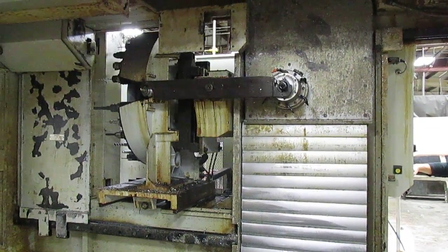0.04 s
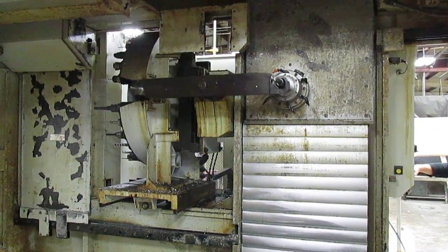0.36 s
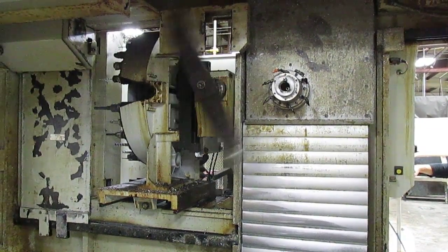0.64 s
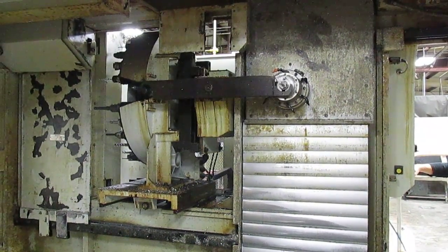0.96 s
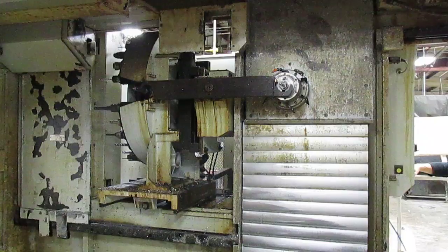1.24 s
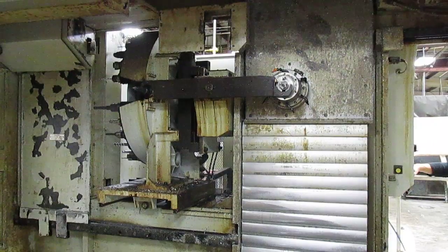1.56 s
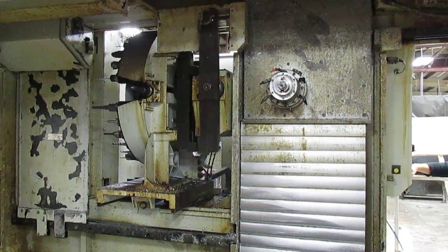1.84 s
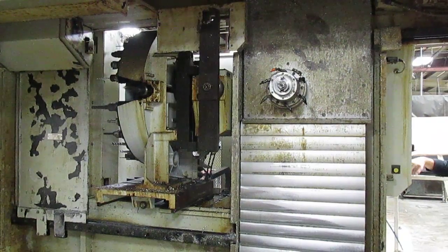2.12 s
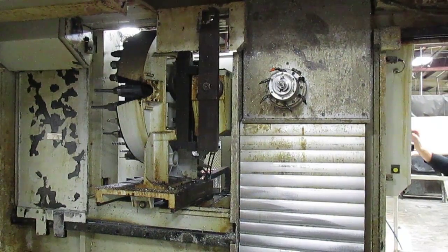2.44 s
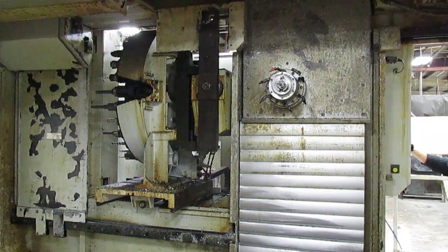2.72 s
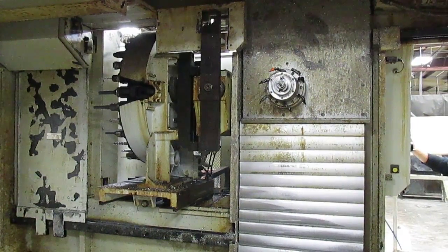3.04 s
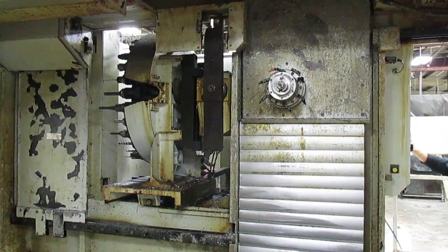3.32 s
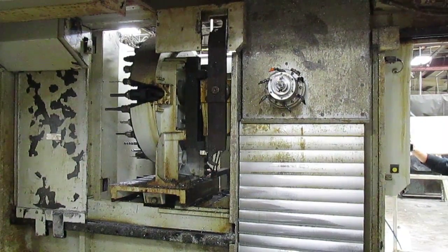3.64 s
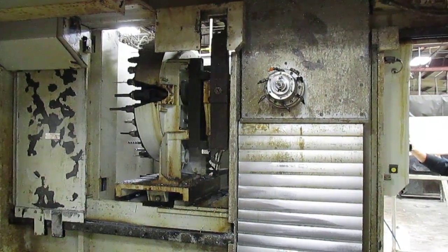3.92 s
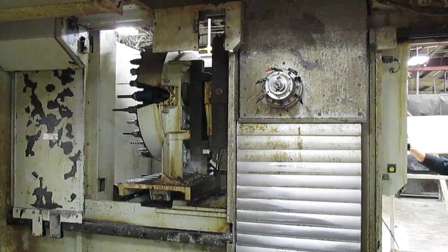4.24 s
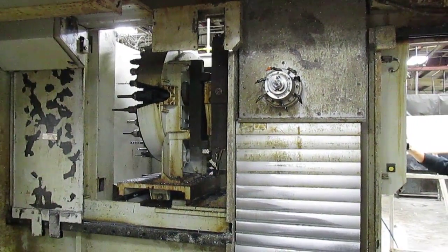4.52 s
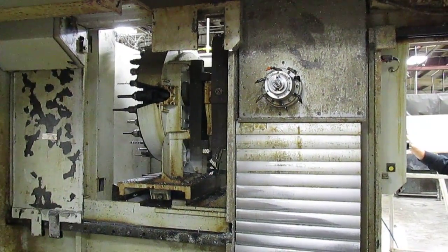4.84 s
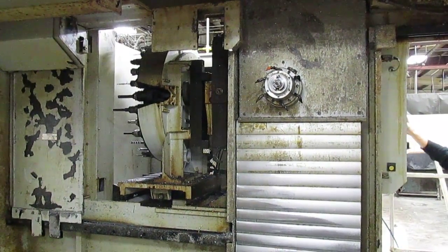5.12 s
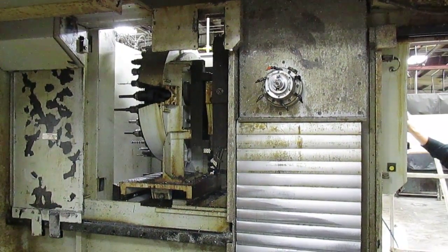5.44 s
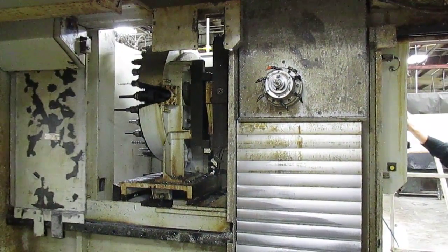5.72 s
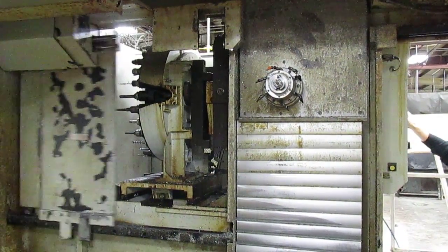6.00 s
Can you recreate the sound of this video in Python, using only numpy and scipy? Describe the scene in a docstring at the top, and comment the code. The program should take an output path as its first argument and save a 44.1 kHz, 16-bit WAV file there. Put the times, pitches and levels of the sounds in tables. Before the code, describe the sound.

A large machine tool changes tools with hissing air blasts, brief high squeals and metal clanks over a steady hum.

```python
"""A machining centre changes its tool in a sheet-steel enclosure, over pump hum and a steady hiss.
Air blasts through the spindle taper as one tool is pulled and squeals as the next one seats.
The changer arm clanks home; air cylinders draw the magazine back and start to shut its door.
Automatic gain control ducks the hum under each blast and lets it swell back."""
import sys
import numpy as np
from scipy import signal
from scipy.fft import rfft, irfft
from scipy.io import wavfile
from scipy.ndimage import uniform_filter1d

SR = 44100
rng = np.random.default_rng(int(sys.argv[2]) if len(sys.argv) > 2 else 0)


def unload_wav(signal):
    """Save mono or channel-first audio to the path in sys.argv[1] as 16-bit WAV at rate SR, clipped to [-1, 1]."""
    wavfile.write(
        sys.argv[1],
        SR,
        np.round(np.clip(np.atleast_2d(signal).T, -1, 1) * 32767).astype(np.int16),
    )


N = 272076
TIME = np.arange(N) / SR

# panel rumble spectrum: f/Hz, level/dB
PANEL_RUMBLE = [(11, -43), (18, 1.5), (49, 0), (92, 6), (107, -7), (120, -20), (160, -14), (260, -120)]
# left-right likeness of diffuse and direct sound: f/Hz, correlation
DIFFUSE = [(60, 1), (290, 0.84), (640, 0.73), (1400, 0.38), (3100, 0.33), (6800, 0.1), (15000, 0.0093)]
DIRECT = [(60, 1), (640, 0.94), (1400, 0.87), (3100, 0.61), (7000, 0.64), (11000, -0.056), (15000, -0.44)]


def amp(db):
    """Decibels to gain."""
    return 10 ** (np.asarray(db) / 20)


def unit(x):
    """Stereo pair scaled to a mid-channel rms of 1."""
    return x / np.sqrt(np.mean(x.mean(0) ** 2) + 1e-20)


def pan(left_db):
    """Channel gains for a left-minus-right level of left_db."""
    return amp([[left_db / 2], [-left_db / 2]])


def at_hz(points, hz):
    """Table interpolated over log frequency."""
    f, value = np.transpose(points)
    return np.interp(np.log(hz + 1), np.log(f + 1), value)


def peaks_db(peaks, hz):
    """Summed lift of resonance peaks and notches."""
    return sum(db / (1 + (2 * (hz - f) / width_hz) ** 2) for f, width_hz, db in peaks)


def add(mix, start_s, sound):
    """Mixes a stereo sound in at start_s."""
    part = mix[:, max(round(start_s * SR), 0):][:, :sound.shape[1]]
    part += sound[:, :part.shape[1]]


def held(start_s, end_s, rise_s, fall_s):
    """Trapezoid envelope; the fall begins at end_s."""
    return np.clip((TIME - start_s) / rise_s, 0, 1) * np.clip(1 - (TIME - end_s) / fall_s, 0, 1)


def envelopes(rows, rise_s, fall_s):
    """One gain envelope per level column of (start, end, levels...) rows."""
    return sum(amp(db)[:, None] * held(start, end, rise_s, fall_s) for start, end, *db in rows)


def drift(rate_hz, size=N):
    """Smooth random wander, rms about 1."""
    hz = np.fft.rfftfreq(N, 1 / SR)
    x = irfft(rfft(rng.standard_normal(N)) / (1 + (hz / rate_hz) ** 2), N)
    return (x / x.std())[:size]


def white_pair(likeness, size):
    """Two white noises with the given correlation per band."""
    left, other = rfft(rng.standard_normal((2, size)))
    corr = np.clip(at_hz(likeness, np.fft.rfftfreq(size, 1 / SR)), -1, 1)
    return irfft([left, corr * left + np.sqrt(1 - corr ** 2) * other], size)


def noise(spectrum, likeness=DIFFUSE, *, patchy_db, size=1024, peaks=(), shift_hz=lambda hz, t: 0):
    """Turbulent stereo noise with resonances moved by shift_hz; small patches come and go."""
    hop = size // 4
    hz = np.fft.rfftfreq(size, 1 / SR)
    t = np.arange(N // hop + 5)[:, None] * hop / SR
    a, b, c, d, patches = rng.standard_normal((5, len(t), len(hz)))
    patches = uniform_filter1d(patches, size=9, axis=0)
    patches = uniform_filter1d(patches, size=7, axis=1)
    corr = np.clip(at_hz(likeness, hz), -1, 1)
    left = a + 1j * b
    right = corr * left + np.sqrt(1 - corr ** 2) * (c + 1j * d)
    colour_db = at_hz(spectrum, hz) + peaks_db(peaks, hz - shift_hz(hz, t))
    frames = np.array([left, right]) * amp(colour_db + patchy_db * patches / patches.std())
    _, x = signal.istft(frames, nperseg=size, noverlap=size - hop, time_axis=1, freq_axis=2)
    return unit(x[:, :N])


def enclosure(x, wet_db, t60_s):
    """Dense reflections between steel walls, alike in both channels only in the bass."""
    t = np.arange(SR // 2) / SR
    tail = white_pair(DIFFUSE, len(t)) * amp(-60 * t / t60_s) * (t > 0.002)
    wet = signal.fftconvolve(x, tail / np.linalg.norm(tail[0]), axes=1)[:, :N]
    return (x + amp(wet_db) * wet) / np.sqrt(1 + amp(wet_db) ** 2)


def pump():
    """Wavering pump and motor tones over the drone and rumble of the panels."""
    # pump and motor tones: f/Hz, level/dB, rms wander/Hz
    partials = [(57.9, -12, 3.66), (120.3, -8.5, 1.07), (243.4, -8.5, 10.07), (268.8, -9.5, 7.2),
                (282.3, -7.5, 4), (424.6, -22, 4), (528, -21, 12.7), (677, -22, 10.54), (846, -20.5, 2.47),
                (1246, -19.5, 2.93), (2300, -23.5, 5.75), (3520, -18.5, 14.5), (3810, -25, 12.3)]
    # drone spectrum: f/Hz, level/dB
    drone_spectrum = [(53, -39), (90, -16), (123, 0), (151, -9), (182, 0.5), (211, -5), (274, 1.5),
                      (291, -6), (313, -5.5), (380, -16.5), (490, -51), (840, -120)]
    # hum swells: start/s, end/s, lift/dB
    swells = [(4.4, 6.3, 0), (5.208, 5.503, 1)]
    hum_db = -31 + sum(db * held(start, end, rise_s=0.17, fall_s=0.17) for start, end, db in swells)
    tones = np.zeros(N)
    for hz, db, wander_hz in partials:
        gain = amp(db + 0.5 * drift(10))
        phase = 2 * np.pi * np.cumsum(hz + wander_hz * drift(12.1)) / SR
        tones += gain * np.sqrt(2) * np.sin(phase)
    drone = noise(drone_spectrum, patchy_db=0.5, size=4096)
    rumble = noise(PANEL_RUMBLE, patchy_db=2, size=4096)
    return amp(hum_db) * (tones + amp(-2.5) * drone) + amp(-41.5) * rumble


def fans_leak_and_oil():
    """Fans whirr and air leaks, coloured by the cabinet; oil rushes and sizzles through open valves."""
    # spectra: f/Hz, level/dB
    fan_spectrum = [(220, -17), (350, -2.5), (480, -4), (740, -12.5), (900, -6), (1280, -4.5), (1700, -6),
                    (2700, -4.5), (3200, 0.5), (3600, -3), (4100, -10), (6500, -13)]
    leak_spectrum = [(2500, -8), (4200, -8), (5000, -9.5), (6200, -8.5), (6800, -6), (8100, -4.5),
                     (9200, -0.5), (11100, 1.5), (12000, -3.5), (13600, -7), (15800, -11)]
    sizzle_spectrum = [(2500, -18), (4300, -3), (5500, -1.5), (6600, -4), (9000, -6), (13000, -9.5),
                       (16000, -17)]
    oil_spectrum = [(1000, -15), (1750, -9.5), (2300, -1.5), (3000, 0), (3700, -1.5), (4600, -7.5),
                    (8000, -28)]
    # cabinet standing waves: f/Hz, width/Hz, lift/dB
    cabinet_peaks = [(1294, 61, 5), (3397, 190, 6), (6880, 490, 5.5), (7480, 220, 1), (8510, 300, 5.5)]
    # hydraulic valves open: start/s, end/s, rush/dB, sizzle/dB
    oil_flows = [(.13, .24, -29, -30), (1.1, 1.6, -28, -24), (1.94, 2.7, -31.5, -34.5),
                 (2.7, 4.15, -33, -43), (4.45, 5.57, -40, -45)]
    oil_gain, sizzle_gain = envelopes(oil_flows, rise_s=0.028, fall_s=0.086)
    fans = noise(fan_spectrum, patchy_db=1, peaks=cabinet_peaks)
    leak = noise(leak_spectrum, patchy_db=1.1, peaks=cabinet_peaks) * pan(left_db=-2)
    sizzle = noise(sizzle_spectrum, patchy_db=2)
    oil = noise(oil_spectrum, patchy_db=3, size=2048)
    steady = amp(-33 + 0.57 * drift(25)) * fans + amp(-29.5) * leak
    return enclosure(steady + sizzle_gain * sizzle + oil_gain * oil, wet_db=-5, t60_s=0.2)


def guideways():
    """Arm, magazine and door grind unevenly along their guides and shake the panels."""
    # sliding spectrum: f/Hz, level/dB
    grind_spectrum = [(120, -5), (220, 3), (500, -1), (1000, -5), (1700, -5.5), (3000, -15.5)]
    # travel: start/s, end/s, grind/dB, rumble/dB
    moves = [(-.05, .11, -28.5, -27), (.15, .25, -29, -32), (.97, 1.1, -25.5, -36), (1.15, 1.37, -34, -36),
             (1.38, 1.55, -40, -31), (1.56, 1.61, -25.5, -26.5), (1.66, 2.05, -29.5, -34),
             (2.42, 2.58, -37.5, -47), (4.07, 4.13, -34, -48), (4.85, 5.55, -50, -44),
             (5.65, 5.69, -27, -36), (5.75, 5.92, -35.5, -35), (5.94, 6.2, -30.5, -35)]
    grind_gain, rumble_gain = envelopes(moves, rise_s=0.04, fall_s=0.07)
    grind = amp(0.22 * drift(35)) * noise(grind_spectrum, patchy_db=0.5)
    rumble = noise(PANEL_RUMBLE, patchy_db=0.5, size=4096)
    return grind_gain * grind + rumble_gain * rumble


def impacts(hits, modes):
    """Each hit cracks, rings the body's modes and sets off a dying clatter of loose parts."""
    out = np.zeros((2, N))
    t = np.arange(SR // 2) / SR
    crack = 0.63 * (1 - t / 0.0031) * np.exp(-t / 0.0054)  # push and rebound of first contact
    for start_s, db, low_hz, high_hz, t60_s, ring_share in hits:
        band = signal.butter(2, [low_hz, high_hz], "band", fs=SR, output="sos")
        clatter = unit(signal.sosfilt(band, white_pair(DIRECT, len(t))))
        clatter *= amp(-60 * t / t60_s + 1.3 * drift(150, len(t)))
        ring = np.zeros((2, len(t)))
        for hz, mode_db, mode_t60_s in modes:
            cycles = hz * t + rng.random() + 0.053 * rng.standard_normal((2, 1))
            ring += amp(mode_db - 60 * t / mode_t60_s) * np.sin(2 * np.pi * cycles)
        body = signal.sosfilt(band, 0.42 * np.sqrt(ring_share) * ring - crack)
        add(out, start_s, amp(db) * (np.sqrt(1 - ring_share) * clatter + body))
    return out


def knocks():
    """Arm, magazine and door strike; the drawbar releases one tool and grips the next."""
    # hits: t/s, level/dB, low cut/Hz, high cut/Hz, clatter t60/s, ring share
    changer_hits = [(.004, -17, 199, 1580, 0.21, .3), (1.355, -16.5, 213, 400, 0.18, 0.78),
                    (1.555, -21, 580, 2450, 0.3, 0.28), (1.598, -19.5, 374, 2530, 0.12, 0.23),
                    (1.705, -10.5, 129, 4100, 0.23, 0.66), (1.826, -21, 450, 750, 0.24, 0.078),
                    (1.936, -19, 1260, 2000, 0.47, 0.62), (1.973, -10, 110, 900, 0.11, 0.087),
                    (1.987, -11.5, 298, 2750, 0.17, 0.11), (2.57, -27, 314, 2320, 0.11, 0.44),
                    (2.708, -18, 35, 91.5, 0.18, 0.054), (4.1, -29.5, 378, 564, 0.28, .1),
                    (5.666, -18, 200, 900, 0.13, 0.57), (5.992, -28, 89, 259, 0.22, .2),
                    (5.998, -31, 700, 2000, 0.13, .4)]
    drawbar_hits = [(.191, -13, 1510, 10100, 0.032, 0.59), (1.014, -5, 500, 3800, 0.094, 0.61)]
    # steel modes: f/Hz, level/dB, t60/s
    changer_modes = [(167, -0.5, 0.52), (267.4, 1.5, 0.2), (565, -6, 0.13), (897, -18, 0.6),
                     (955, -20, 0.3), (1270, -15, 0.36), (1436, 1, 0.085), (1795, -5.5, 0.4),
                     (2320, -18, 0.21), (2770, 7, 0.049), (3180, -5, 0.21), (3400, 6, 0.1),
                     (3820, 5, 0.068), (6660, 8, 0.068)]
    spindle_modes = [(262, -5, 0.27), (920, 5.5, 0.071), (1364, -2, 0.12), (2660, 7, 0.045),
                     (3080, 13.5, 0.024), (3680, -10, .05), (6950, -9, .04)]
    strikes = impacts(drawbar_hits, spindle_modes) + impacts(changer_hits, changer_modes)
    return enclosure(strikes, wet_db=-6, t60_s=0.44)


def air_blast(open_s, close_s, rise_s, fall_s):
    """A blast of air starts a little louder, holds steady, then dies away."""
    onset_db, onset_s = 4.5, 0.13
    age_s = np.maximum(TIME - open_s, 0)
    return held(open_s, close_s, rise_s, fall_s) * amp(onset_db * np.exp(-age_s / onset_s))


def exhausts():
    """Valves vent through mufflers: short puffs, then long blows for magazine and door cylinders."""
    # valve puffs: t/s, level/dB, t60/s
    puffs = [(0.034, -18.5, 0.62), (.14, -21.5, 0.13), (1.34, -16.5, 0.093), (1.59, -19.5, 0.4),
             (1.933, -16.5, 0.4)]
    # exhaust spectra: f/Hz, level/dB
    muffler_spectrum = [(500, -37), (900, -14), (1350, -9), (1750, -5), (2200, -5.5), (3300, -2),
                        (4300, -5), (7700, -4), (10500, 1.5), (13700, -5.5), (15800, -11)]
    door_spectrum = [(2350, -31), (4000, -13), (6110, -8.5), (6820, -5), (7700, -8), (8700, -3),
                     (10800, -1), (15100, -12), (16000, -34)]
    # muffler resonances: f/Hz, width/Hz, lift/dB
    muffler_peaks = [(1420, 110, 2.9), (1716, 67, 7.9), (2790, 140, 2.2), (3200, 140, 1.8), (3650, 160, 1)]
    puff_gain = np.zeros(N)
    for start_s, db, t60_s in puffs:
        age_s = np.maximum(TIME - start_s, 0)
        puff_gain += amp(db - 60 * age_s / t60_s) * (1 - np.exp(-age_s / 0.0012))
    magazine_gain = amp(-20) * air_blast(open_s=2.705, close_s=4.105, rise_s=0.03, fall_s=0.22)
    door_gain = amp(-26.5) * air_blast(open_s=5.565, close_s=6.3, rise_s=0.035, fall_s=0.17)
    muffler_hiss = noise(muffler_spectrum, patchy_db=2, size=2048, peaks=muffler_peaks)
    door_hiss = noise(door_spectrum, patchy_db=0)
    return ((puff_gain + magazine_gain) * muffler_hiss + door_gain * door_hiss) * pan(left_db=0.5)


def clearance(t):
    """Tool distance from the taper: 0 seated, 1 clear."""
    # one tool out, the next in: t/s, clearance
    tool_path = [(.2, 0.061), (.275, 0.098), (.35, .95), (.65, 1), (.87, 0.61), (.945, 0.38), (.985, 0.17),
                 (1.02, 0.03)]
    return np.interp(t, *np.transpose(tool_path))


def taper_purge():
    """Air hisses round the shank; with the tool out the bore resonates, detuned while a tool is near."""
    # jet spectra: f/Hz, level/dB
    gap_spectrum = [(350, -41), (600, -16.5), (1410, -10), (2070, -15), (2680, -10), (3120, -5),
                    (3890, -12.5), (5400, -5.5), (8160, -5), (9620, -2.5), (11800, 0.5), (15400, -11),
                    (16000, -20)]
    bore_spectrum = [(290, -95), (500, -29.5), (893, -12), (1180, -16.5), (2130, -19.5), (2690, -19),
                     (3020, -6), (3390, -12), (7420, -5.5), (8090, -13), (8830, -0.5), (14700, -5.5),
                     (16000, -4.5)]
    # bore resonances: f/Hz, width/Hz, lift/dB
    bore_peaks = [(850, 130, 5.5), (2110, 170, 13.5), (2570, 350, -13), (2950, 370, 6), (4230, 170, -4),
                  (4470, 200, 1), (5200, 830, -7), (6550, 450, 4.5), (7660, 180, 8.5), (7820, 280, -11),
                  (8700, 480, 5.5), (9640, 220, 6.5), (9700, 440, -10.5), (11520, 1070, 11),
                  (11720, 430, -27), (12500, 400, -5), (13450, 400, -6), (14300, 250, 2), (14500, 550, 3)]
    # detuning by a tool at the mouth: f/Hz, shift/Hz
    detuning = [(900, -170), (2130, 150), (3000, 130), (5000, 0)]
    open_s, close_s, build_s = 0.189, 1.093, 0.23
    gap_db, widening_db, bore_db = -14, 10.5, -5
    gap_width = clearance(TIME) / 0.24  # at 1, half the air leaves through the bore
    bore_share = gap_width ** 3 / (1 + gap_width ** 3)
    gap = noise(gap_spectrum, DIRECT, patchy_db=5)
    bore = noise(bore_spectrum, DIRECT, patchy_db=2.5, peaks=bore_peaks,
                 shift_hz=lambda hz, t: (1 - clearance(t)) * at_hz(detuning, hz))
    build_up = 1 - np.exp(-np.maximum(TIME - open_s, 0) / build_s)
    gap_gain = (1 - bore_share) * amp(gap_db + widening_db * np.minimum(gap_width, 1))
    bore_gain = build_up * bore_share * amp(bore_db) * pan(left_db=-1)
    flow = held(open_s, close_s, rise_s=0.0025, fall_s=0.096) * amp(0.3 * drift(40))
    return enclosure(flow * (gap_gain * gap + bore_gain * bore), wet_db=-12, t60_s=0.15)


def squeals():
    """The jet locks briefly onto edge tones that glide as the gap changes."""
    # edge tones: t/s, length/s, start f/Hz, end f/Hz, level/dB, rms wander/Hz
    edge_tones = [(.225, 0.028, 10100, 9600, -14, 360), (.26, 0.055, 9450, 8960, -15, 160),
                  (0.45, 0.48, 14805, 14812, -26, 12), (.976, 0.011, 11500, 11700, -7, 91),
                  (1.007, .1, 10360, 10450, -20, 110), (1.087, 0.021, 12560, 12450, -3.5, 15),
                  (1.149, .009, 13600, 12900, -20, 100), (1.157, .009, 12700, 12500, -11.5, 30)]
    out = np.zeros((2, N))
    for start_s, length_s, start_hz, end_hz, db, wander_hz in edge_tones:
        size = int(length_s * SR)
        hz = np.linspace(start_hz, end_hz, size) + wander_hz * drift(300, size)
        tone = np.sqrt(2) * np.sin(2 * np.pi * np.cumsum(hz) / SR)
        add(out, start_s, amp(db) * tone * signal.windows.tukey(size, 0.2) * pan(left_db=-2))
    return enclosure(out, wet_db=-12, t60_s=0.25)


def gain_control(x, hop=128):
    """Gain drops fast under a loud sound and creeps back up."""
    target_db, ratio, full_gain_db = -17.5, 8.5, 11.5
    duck_s, recover_s, max_duck_db_per_s = 0.054, 1.99, 94
    power = uniform_filter1d((x ** 2).mean(0), size=4 * hop)[::hop]
    level_db = 10 * np.log10(abs(power) + 1e-12)
    gain_db, track_db = -6, []
    for allowed_db in (target_db - level_db) * (1 - 1 / ratio):
        duck_db_per_s = min(max(gain_db - allowed_db, 0) / duck_s, max_duck_db_per_s)
        gain_db += hop / SR * ((full_gain_db - gain_db) / recover_s - duck_db_per_s)
        track_db.append(gain_db)
    return x * amp(np.interp(TIME, TIME[::hop], track_db))


def scene():
    """All parts of the machine, in stereo."""
    return pump() + fans_leak_and_oil() + taper_purge() + squeals() + exhausts() + guideways() + knocks()


def record(dry):
    """Slightly different colour per channel, then gain control and a low-pass."""
    # channel balance: f/Hz, left minus right/dB
    balance = [(60, 0.5), (110, 1), (200, 1.5), (380, 0.5), (700, 0), (1290, 2.5), (2380, -1.5),
               (4400, -2.0), (8120, 0), (15000, 1.5)]
    tilt_db = at_hz(balance, np.fft.rfftfreq(N, 1 / SR)) / 2
    coloured = irfft(rfft(dry) * amp([tilt_db, -tilt_db]), N)
    cutoff_hz = 15900
    lowpass = signal.firwin(511, cutoff_hz, window=("kaiser", 9), fs=SR)
    return signal.oaconvolve(gain_control(coloured), lowpass[None], "same")


dry = scene()
out = record(dry)
unload_wav(out)
```